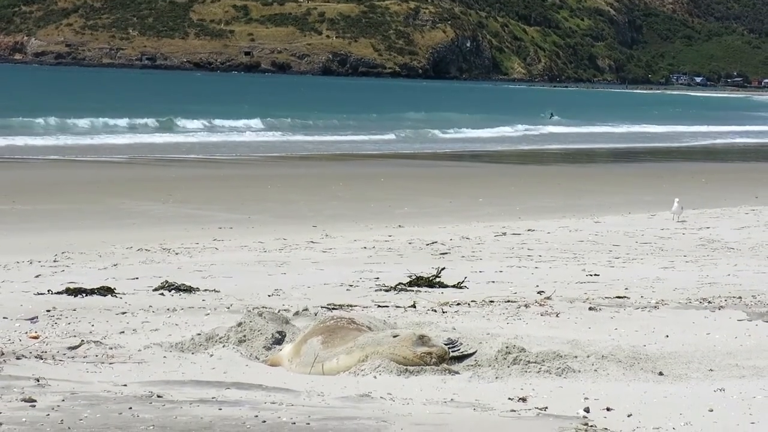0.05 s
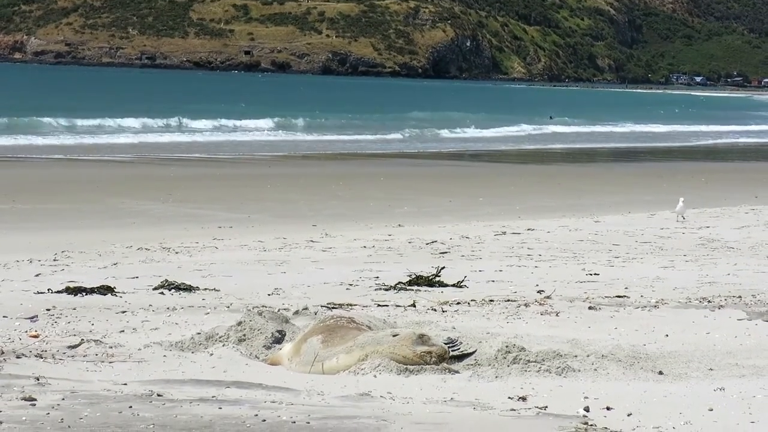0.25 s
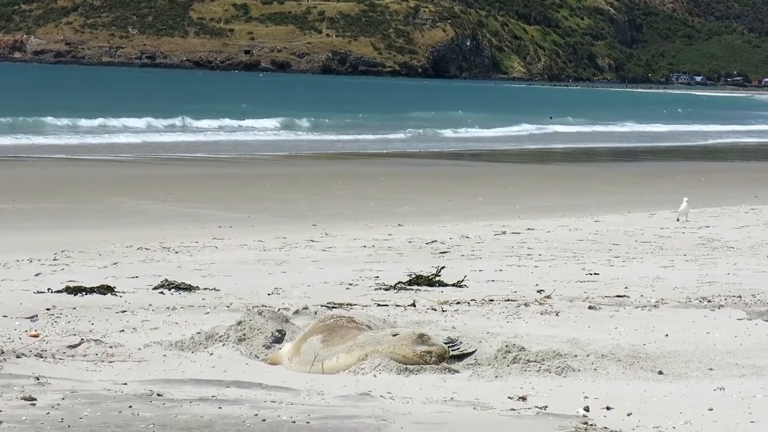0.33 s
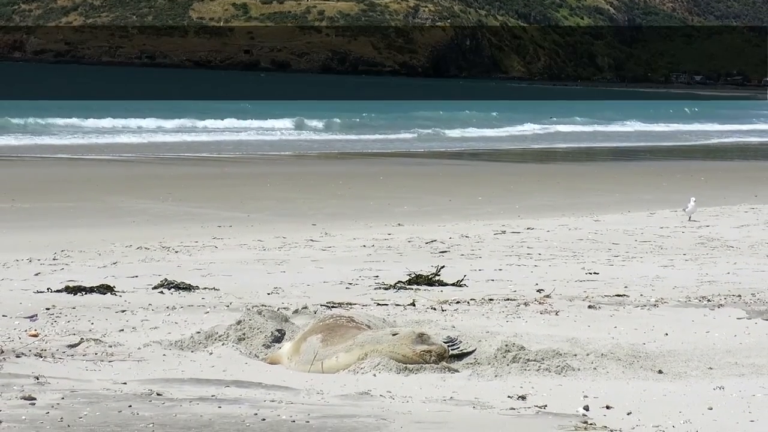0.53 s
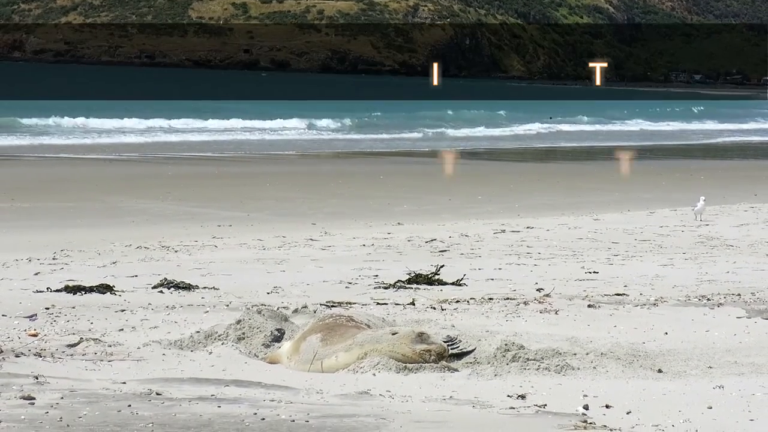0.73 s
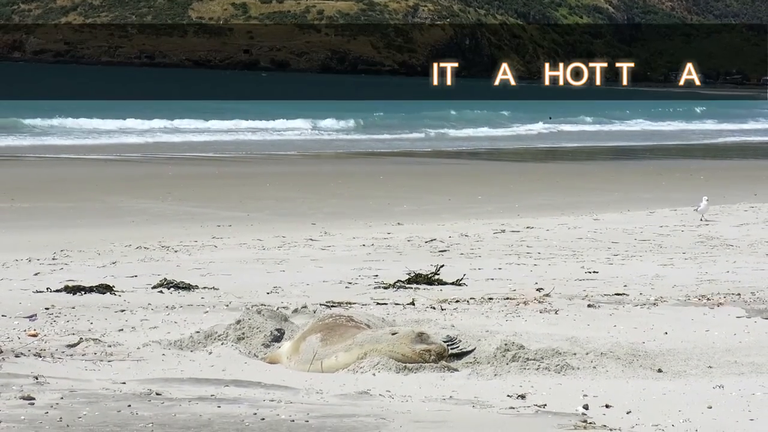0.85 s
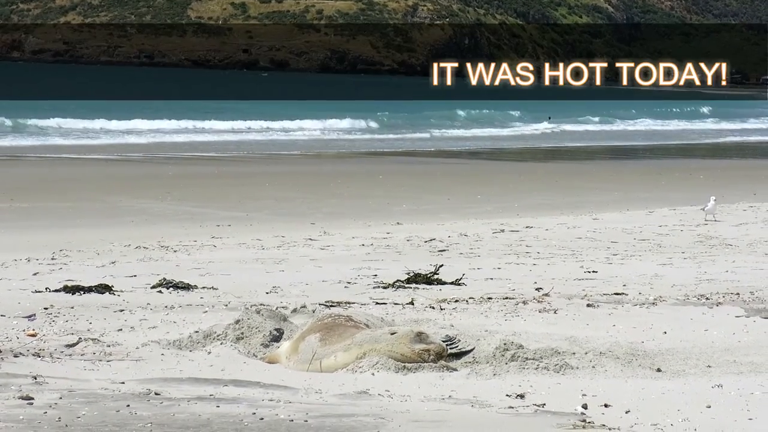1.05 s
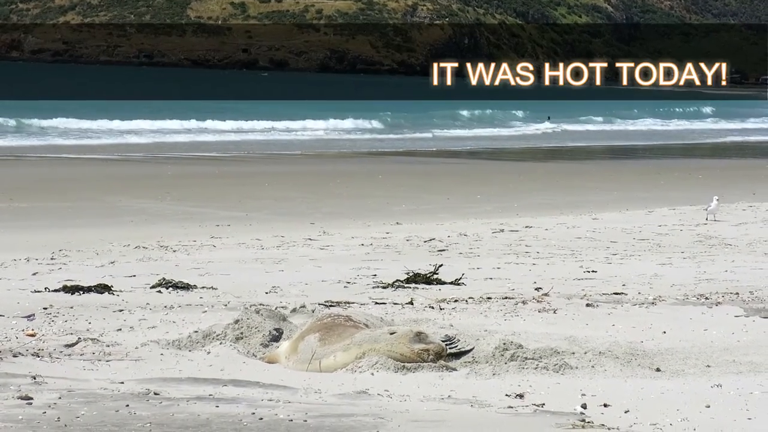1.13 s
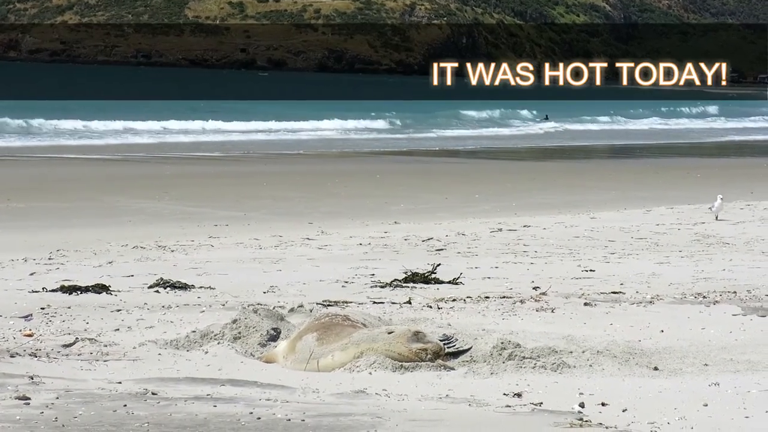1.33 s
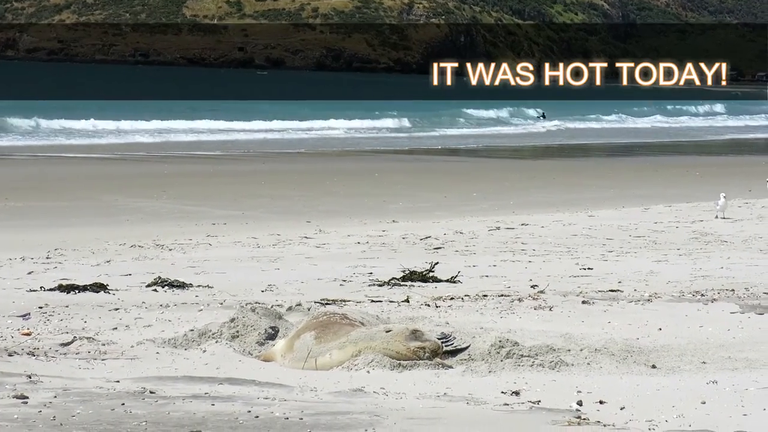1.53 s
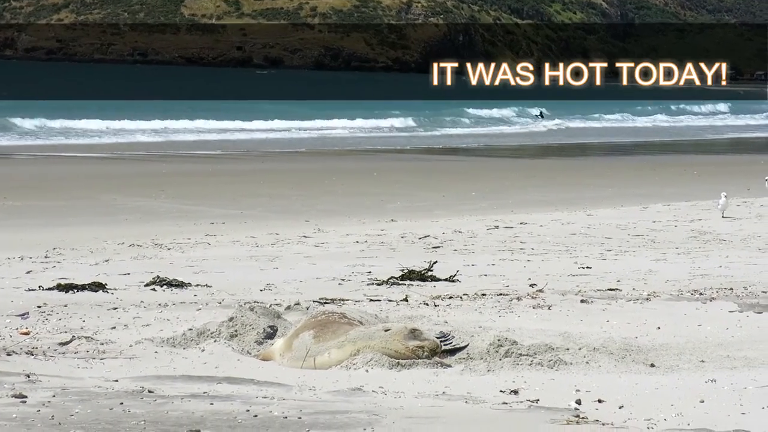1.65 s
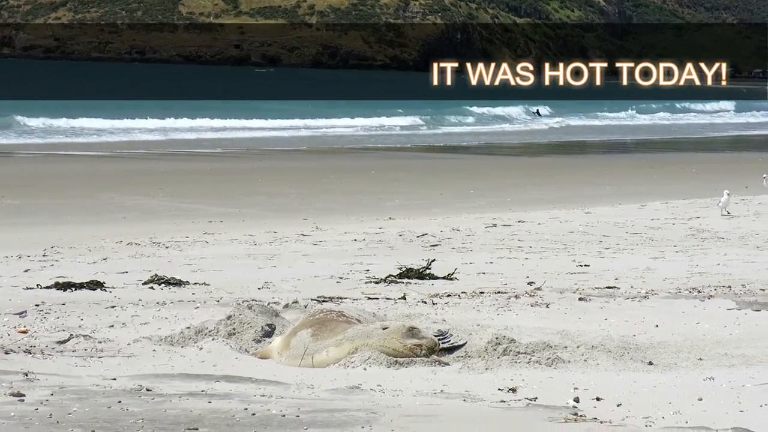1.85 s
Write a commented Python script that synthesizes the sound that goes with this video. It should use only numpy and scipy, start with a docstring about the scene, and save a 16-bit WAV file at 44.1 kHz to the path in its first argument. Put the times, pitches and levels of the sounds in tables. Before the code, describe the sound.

Wind buffeting on a bare stereo camera microphone at an open beach. At first only a soft, steady wash of distant surf, leaning left. Light thumps begin near 0.4 seconds; from 0.68 hard, low flutters and rumbles crowd in, with small snaps, strongest around 1.3. Loud gusts duck the surf. The thumps fade by 1.7, leaving subdued waves slowly recovering.

```python
"""Windy open beach

A camera on an open beach: waves break some way off to the left in a steady wash, made of bands of noise.
Gusts push the two microphone ports in opposite directions: noise rumbles and swinging thumps buffet them.
Snaps, one thin tick and a faint electronic whine are added.
Loud moments make the gain control duck everything, the surf too, which then creeps back; peaks are squashed.
"""
import sys
import numpy as np
from scipy import signal
from scipy.fft import rfft, irfft, next_fast_len
from scipy.io import wavfile
from scipy.ndimage import uniform_filter1d

SR = 44100
rng = np.random.default_rng(int(sys.argv[2]) if len(sys.argv) > 2 else 0)


def master(y):
    """Save y as 16-bit WAV."""
    cut = np.clip(np.atleast_2d(y).T, -1, 1)
    pcm = np.round(cut * 32767)  # scale
    wavfile.write(sys.argv[1], SR, pcm.astype(np.int16))


N = 83790   # length in samples
TIME = np.arange(N) / SR   # seconds


def amp(db):
    """Turn decibels into a gain."""
    return 10 ** (np.asarray(db) / 20)


def rms_one(x):
    """Scale a sound to an rms level of 1."""
    return x / np.sqrt(np.mean(x ** 2) + 1e-20)


def in_time(rows):
    """Join the points of a curve by straight lines and read it at every sample."""
    return np.interp(TIME, *np.transpose(rows))


def at_hz(points, hz):
    """Read a curve over frequency, with pitch spaced evenly by octaves."""
    point_hz, values = np.array(points).T
    return np.interp(np.log(hz), np.log(point_hz), values)


def drift(rate_hz):
    """Slow random wandering with a spread of 1: smoothed noise made at every 20th sample."""
    r = np.exp(-2 * np.pi * rate_hz * 20 / SR)
    noise = rng.standard_normal(N // 20 + 3002)
    slow = signal.lfilter([1], [1, -2 * r, r * r], noise)[3000:]   # drop the filter's start-up
    return np.interp(np.arange(N) / 20, np.arange(len(slow)), rms_one(slow))


def band(x, low_hz, high_hz):
    """Keep only the sound between two frequencies."""
    return signal.sosfilt(signal.butter(2, [low_hz, high_hz], "band", fs=SR, output="sos"), x)


def coloured(spectrum):
    """Noise shaped by a spectrum, falling away steeply beyond both ends of it, with rms 1."""
    hz = np.maximum(np.fft.rfftfreq(N, 1 / SR), 1)
    fall_above_db = 24 * np.log2(np.maximum(hz / spectrum[-1][0], 1))   # 24 dB per octave
    fall_below_db = 12 * np.log2(np.maximum(spectrum[0][0] / hz, 1))    # 12 dB per octave
    gain = amp(at_hz(spectrum, hz) - fall_above_db - fall_below_db)
    return rms_one(irfft(rfft(rng.standard_normal(N)) * gain, N))


# Thumps of wind on the ports. Each row: centre in seconds, height in dB at the left port before
# gain control, length in seconds, middle pitch in Hz, level of the rough edge in dB relative to the height.
BUFFETS = [(0.391, -33, 0.012, 69, -20), (0.478, -38, 0.0085, 101.7, -31), (0.529, -26.5, 0.0039, 120, -24),
           (0.573, -23, 0.006, 196, -15.5), (0.603, -27, 0.013, 98, -34), (0.662, -16.5, 0.0088, 168, -16),
           (.6836, -7.5, 0.0045, 157, -17.5), (0.706, -16, 0.0059, 108, -24),
           (0.7272, -10, 0.0061, 196, -16.5), (0.742, -10, 0.0099, 111, -21), (0.759, -18, 0.022, 124, -26),
           (.811, -15.5, 0.011, 145.2, -23), (0.836, -18.5, 0.01, 110.5, -27),
           (0.894, -12, 0.014, 109.4, -28), (0.92, -16, .018, 168.5, -10.5),
           (0.974, -19.5, 0.008, 120, -20), (0.9845, -10.5, 0.0053, 192, -9.5),
           (0.997, -18.5, 0.0035, 205, -5.5), (1.008, -11, 0.009, 161, -22),
           (1.034, -18.5, 0.0066, 207, -6.5), (1.0655, -8, 0.012, 212, -12.5),
           (1.086, -14, 0.0079, 125.5, -15), (1.193, -19.5, 0.0096, 93.4, -32),
           (1.261, -16, 0.0041, 198, -12), (1.277, -10.5, 0.0085, 154, -13), (1.290, -17, 0.0092, 162, -7),
           (1.3066, -3, 0.0059, 173.5, -15), (1.354, -8.5, 0.0078, 142, -15),
           (1.367, -6.5, 0.0063, 127, -34), (1.458, -12.5, 0.013, 158, -8.5), (1.491, -15, 0.008, 167, -10),
           (1.51, -21.5, 0.0031, 198, -33), (1.555, -27, 0.01, 141.5, -22),
           (1.59, -16.5, 0.013, 103.1, -19.5), (1.638, -21.5, 0.011, 182, -19),
           (1.655, -17.5, 0.0098, 199, -19)]
PITCH_WOBBLE, WOBBLE_HZ = .14, 60   # share by which the pitch wanders, and how fast
TAIL_STRETCH = 1.39   # the fall lasts longer than the rise by this factor


def buffets():
    """A few uneven swings of pressure per buffet, a suck then a push; also the outline of the rough edges."""
    swings, edge = np.zeros(N), np.zeros(N)
    pace = np.exp(PITCH_WOBBLE * drift(WOBBLE_HZ) - PITCH_WOBBLE ** 2 / 2)
    uneven_time = np.cumsum(pace) / SR
    for centre_s, height_db, length_s, hz, edge_db in BUFFETS:
        width = np.where(TIME < centre_s, length_s, TAIL_STRETCH * length_s) / 2
        shape = amp(height_db) * np.exp(-((TIME - centre_s) / width) ** 2 / 2)
        since_centre = uneven_time - uneven_time[int(centre_s * SR)]
        swings += shape * np.sin(2 * np.pi * hz * since_centre)
        edge += amp(edge_db) * shape
    return swings, edge


# Strength of the rumble between buffets. Each row: time in seconds, base level in dB.
GUST = [(0, -53), (.34, -54.5), (.39, -46), (.55, -42), (.63, -40.5), (.69, -19), (.78, -30), (.87, -28.5),
        (.94, -26), (1.0, -22), (1.09, -23.5), (1.14, -34.5), (1.245, -45), (1.28, -15.5), (1.325, -20.5),
        (1.343, -31.5), (1.37, -21.5), (1.42, -28.5), (1.48, -23.5), (1.56, -30), (1.66, -36.5), (1.7, -54),
        (1.9, -61)]
# Colour of the rumble. Each row: frequency in Hz, relative level in dB per Hz.
RUMBLE = [(20, -13), (45, -12), (90, 1), (170, -8), (240, -9), (400, -23.5), (800, -42.5)]
# Colour of the deepest rumble. Each row: frequency in Hz, relative level in dB per Hz.
DEEP = [(15, -8), (35, -12), (70, 9), (110, -9.5)]
# Colour of the rough edges. Each row: frequency in Hz, relative level in dB per Hz.
EDGE = [(150, -1.5), (280, -0.5), (450, -7), (700, -18), (1200, -41)]
RUMBLE_LUMPS_DB, RUMBLE_LUMPS_HZ = 2.5, 38   # random unevenness of the rumble, and how fast
DEEP_DB, DEEP_FOLLOWS = -26.5, 0.51   # the deepest rumble follows the gust's dB by this share
WIND_RIGHT_DB = -3   # the right port is weaker
WIND_SHARED_DB, SHARED_EDGE_DB = -15.5, 2.5   # wind pushing both ports alike, and its extra edge


def wind_noise(edge, gust_db, edge_db):
    """Rough edges, rumble and deepest rumble, each as its own coloured noise."""
    rough = amp(edge_db) * edge * coloured(EDGE)
    lumps_db = RUMBLE_LUMPS_DB * drift(RUMBLE_LUMPS_HZ)
    rumble = amp(gust_db + lumps_db) * coloured(RUMBLE)
    deep = amp(DEEP_DB + DEEP_FOLLOWS * gust_db) * coloured(DEEP)
    return rough + rumble + deep


def wind():
    """Buffets push the two ports in opposite directions; rumble and edges mostly so, a little shared."""
    gust_db = in_time(GUST)
    swings, edge = buffets()
    opposed = swings + wind_noise(edge, gust_db, 0)
    shared = amp(WIND_SHARED_DB) * wind_noise(edge, gust_db, SHARED_EDGE_DB)
    return (opposed * [[1], [-1]] + shared) * amp([[0], [WIND_RIGHT_DB]])


# Sharp snaps close to hard buffets. Each row: start in seconds, left level in dB before the decay, pitch in Hz.
SNAPS = [(.6807, -14.5, 460), (1.2965, -26, 860), (1.3035, -28, 900)]
SNAP_DECAY_S, SNAP_RIGHT = .0014, -.1   # the right port gets this share, turned over


def snaps():
    """Each snap is a swing of pressure that dies away very quickly."""
    out = np.zeros(N)
    for start_s, level_db, hz in SNAPS:
        since = np.maximum(TIME - start_s, 0)
        out -= amp(level_db) * np.exp(-since / SNAP_DECAY_S) * np.sin(2 * np.pi * hz * since)
    return out * [[1], [SNAP_RIGHT]]


# Swell of the surf. Each row: time in seconds, level in dB rms before gain control.
SWELL = [(0, -50), (.3, -48), (.65, -48), (.9, -47), (1.1, -51), (1.3, -48), (1.5, -45), (1.7, -45.5),
         (1.9, -46)]
# Colour of the surf. Each row: frequency in Hz, relative level in dB.
SURF = [(100, 1), (220, 3.5), (420, -1.5), (700, 1), (1050, -6), (1400, -4.5), (2200, -8), (3300, -14.5),
        (5000, -18.5), (7000, -32.5), (10000, -34.5), (15000, -50)]
# How alike left and right are. Each row: frequency in Hz, likeness from 0 to 1.
SURF_LIKENESS = [(150, 0.17), (500, 0.22), (1000, 0.34), (2000, 0.57), (4000, 0.98), (6000, 0.22),
                 (9000, 0.087), (15000, 0.33)]
# Balance of the surf. Each row: frequency in Hz, left minus right in dB.
SURF_BALANCE = [(100, -1.5), (300, 1), (700, 3.5), (1200, 9), (2000, 5.5), (3300, 3.5), (5500, 2),
                (9000, -1)]
# The wash grows duller and brightens again. Each row: time in seconds, change above 2 kHz in dB.
SURF_TREBLE = [(0, 0.5), (.7, 0.5), (1.0, 2), (1.25, 0), (1.45, -1.5), (1.7, -2.5), (1.9, 0)]
SURF_LAG_S = 3.2e-5   # the right port hears the waves later
# flicker of each band alone, of all bands together, and of the foam above 5 kHz
SURF_PATCHY_DB, SURF_TOGETHER_DB, FOAM_PATCHY_DB = .8, .3, .6


def surf():
    """Breaking waves: third-octave bands of stereo noise, each with its own flicker, likeness and balance."""
    out, together, foam = 0, drift(6), drift(10)
    treble_db = in_time(SURF_TREBLE)
    edges = 90 * 2 ** np.arange(0, 7.6, 1 / 3)
    white = rng.standard_normal((2, 3, N))   # two sets, so neighbouring bands differ
    lag = np.exp(-2j * np.pi * np.fft.rfftfreq(N, 1 / SR) * SURF_LAG_S)
    late = irfft(rfft(white[:, :1]) * lag, N)
    white = np.concatenate([white, late], axis=1)
    for k, (low, high) in enumerate(zip(edges, edges[1:])):
        common, left, right, delayed = band(white[k % 2], low, high)
        hz = np.sqrt(low * high)
        alike = np.clip(at_hz(SURF_LIKENESS, hz), 0, 1)
        same = np.sqrt(alike) * np.array([common, delayed])
        separate = np.sqrt(1 - alike) * np.array([left, right])
        flicker_db = SURF_PATCHY_DB * drift(8.5) + SURF_TOGETHER_DB * together
        flicker_db = flicker_db + FOAM_PATCHY_DB * foam * (hz > 5000) + treble_db * (hz > 2000)
        balance_db = at_hz(SURF_BALANCE, hz) / 2 * np.array([[1], [-1]])
        out = out + (same + separate) * amp(at_hz(SURF, hz) + flicker_db + balance_db)
    return amp(in_time(SWELL)) * rms_one(out)


TICK_S, TICK_HZ, TICK_DECAY_S = 1.389, 7600, .005
TICK_DB = -52   # gain on the band-passed burst


def tick():
    """One thin tick in the treble: a short burst of noise that dies away, kept to a bright band."""
    since = TIME - TICK_S
    fade = np.exp(-np.maximum(since, 0) / TICK_DECAY_S) * (since > 0)
    burst = rng.standard_normal((2, N)) * fade
    return amp(TICK_DB) * band(burst + 1e-18, TICK_HZ * .8, TICK_HZ * 1.4)


# Whine of the camera electronics. Each row: pitch in Hz, level in dB rms before gain control.
WHINE = [(13238, -103), (15735, -99)]


def whine():
    """Faint steady pure tones, the same on both sides."""
    return sum(np.sqrt(2) * amp(db) * np.sin(2 * np.pi * hz * TIME) for hz, db in WHINE)


def scene():
    """Wind, snaps, surf, tick and whine all sound together."""
    return wind() + snaps() + surf() + tick() + whine()


DUCK_FROM_DB, DUCK_SLOPE = -16, 1.128   # ducking starts here; dB of cut per dB above it
DUCK_LISTENS_S, DUCK_ATTACK_S, DUCK_RELEASE_S = 0.011, 0.01, 0.87
CLIP, CLIP_KNEE = .315, 12   # loudest possible swing before the top is cut; higher knee bends more sharply
CUTOFF_HZ = 15800


def record(dry):
    """Gain control ducks after loud moments and recovers slowly; what slips past is squashed; the top is cut."""
    outline = np.abs(signal.hilbert(dry, next_fast_len(N))[:, :N])
    power = np.mean(outline ** 2, axis=0)
    level_db = 10 * np.log10(uniform_filter1d(power, max(int(DUCK_LISTENS_S * SR), 1)) + 1e-12)
    over_db = np.maximum(DUCK_SLOPE * (level_db - DUCK_FROM_DB), 1e-3)
    # hold each peak of the cut and let it shrink exponentially
    ramp = TIME / DUCK_RELEASE_S
    held_db = np.exp(np.maximum.accumulate(np.log(over_db) + ramp) - ramp)
    r = np.exp(-1 / (DUCK_ATTACK_S * SR))
    cut_db = signal.lfilter([(1 - r) ** 2], [1, -2 * r, r * r], held_db)   # smooth the onset
    ducked = dry * amp(-cut_db)
    squashed = ducked / (1 + np.abs(ducked / CLIP) ** CLIP_KNEE) ** (1 / CLIP_KNEE)
    return signal.sosfilt(signal.ellip(12, .5, 60, CUTOFF_HZ, fs=SR, output="sos"), squashed)


dry = scene()
out = record(dry)
master(out)
```